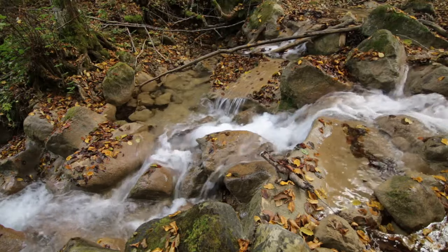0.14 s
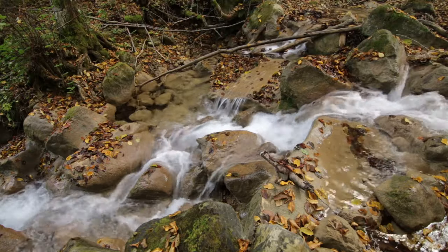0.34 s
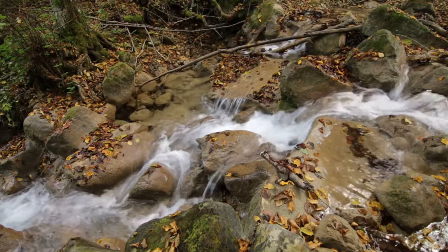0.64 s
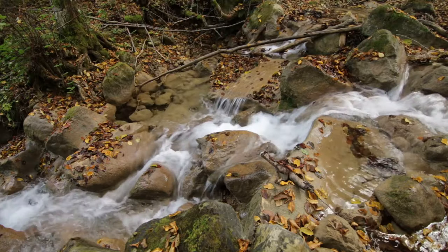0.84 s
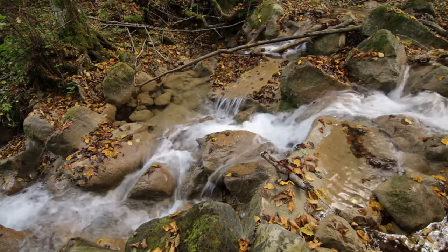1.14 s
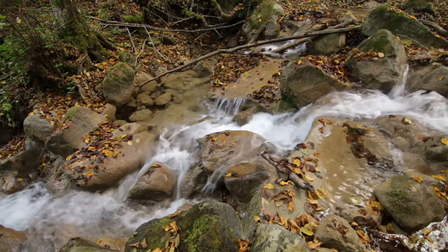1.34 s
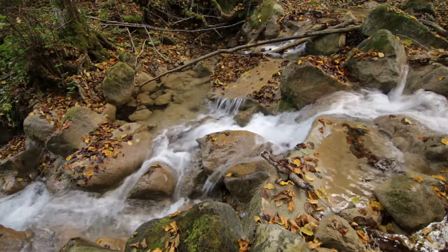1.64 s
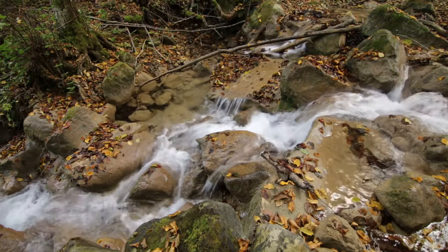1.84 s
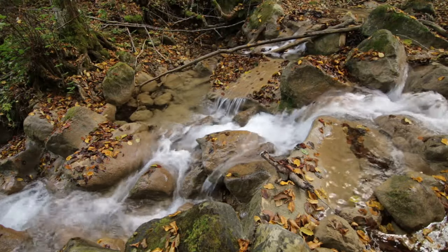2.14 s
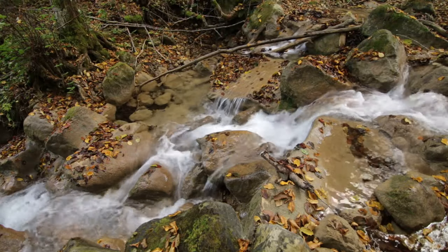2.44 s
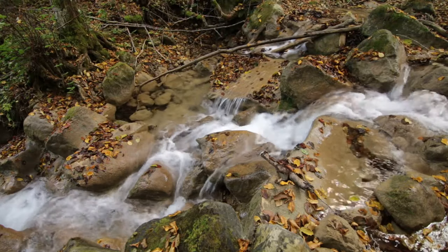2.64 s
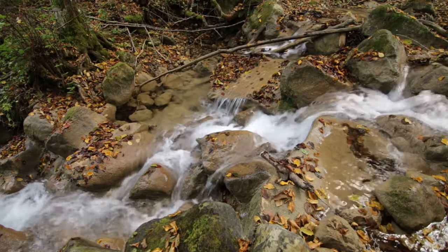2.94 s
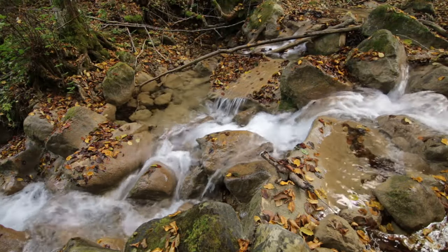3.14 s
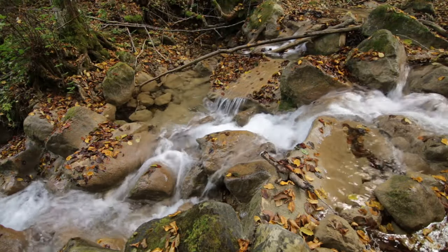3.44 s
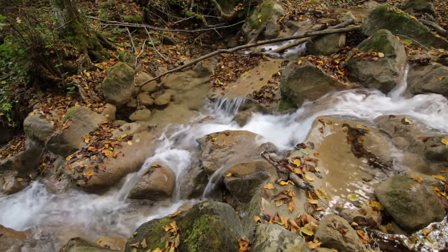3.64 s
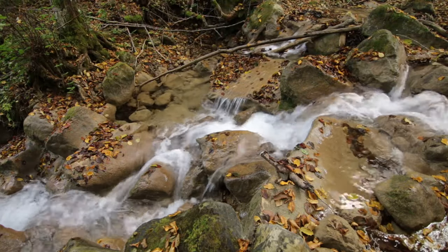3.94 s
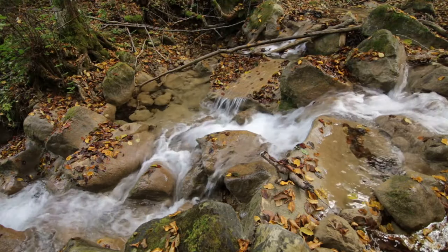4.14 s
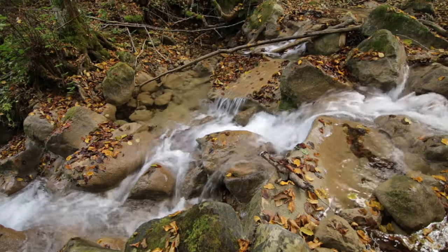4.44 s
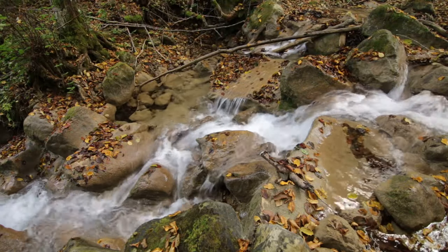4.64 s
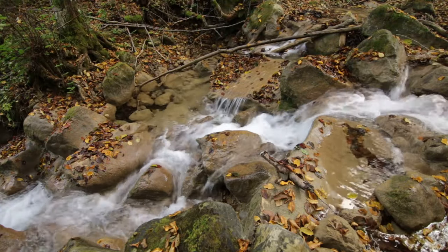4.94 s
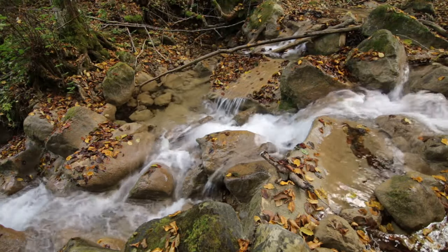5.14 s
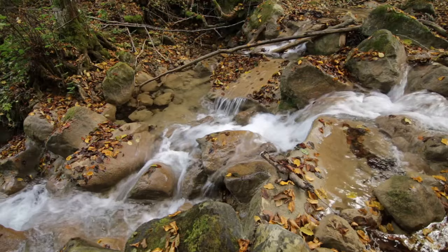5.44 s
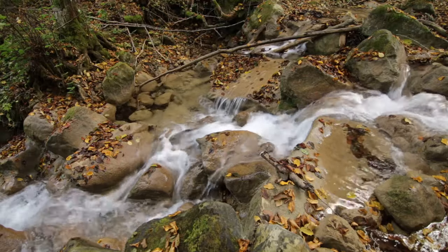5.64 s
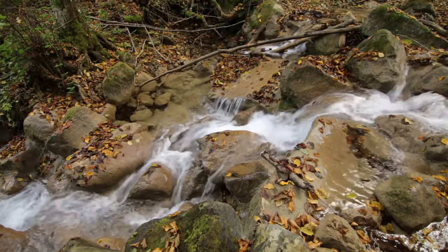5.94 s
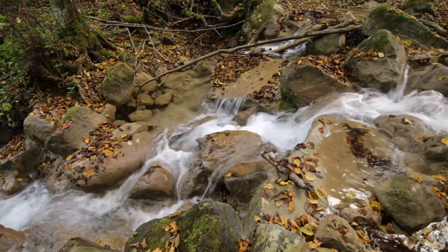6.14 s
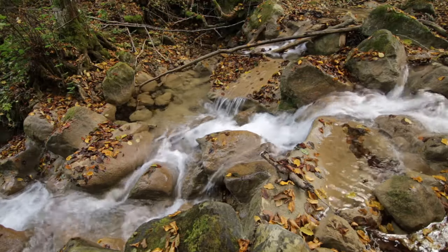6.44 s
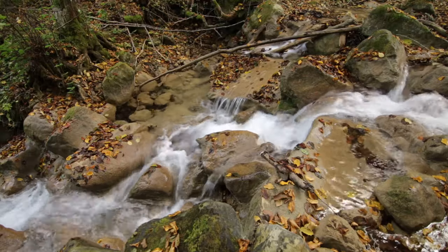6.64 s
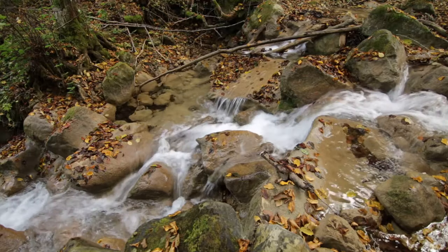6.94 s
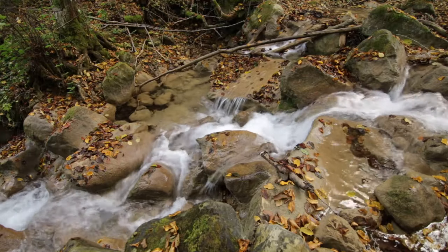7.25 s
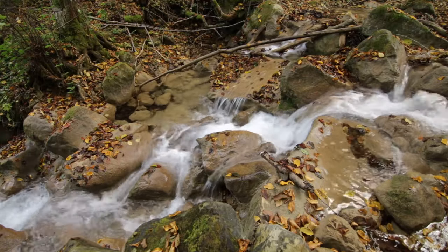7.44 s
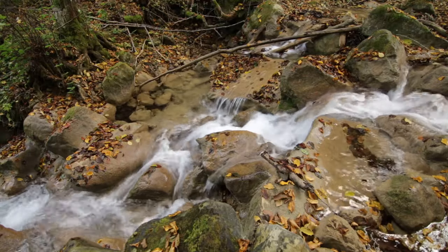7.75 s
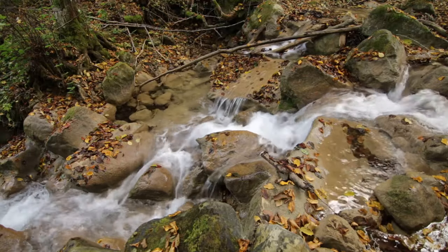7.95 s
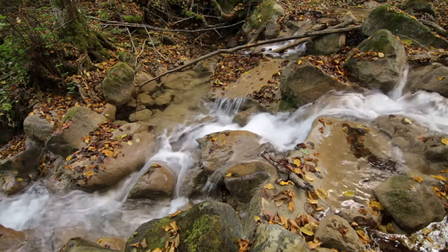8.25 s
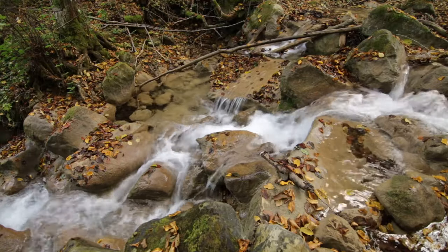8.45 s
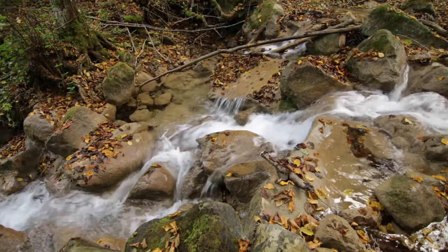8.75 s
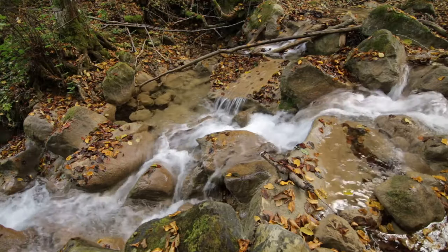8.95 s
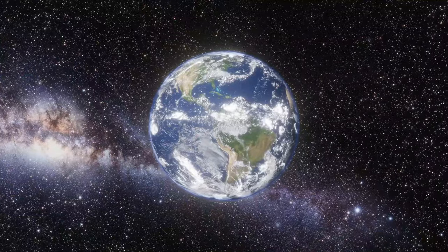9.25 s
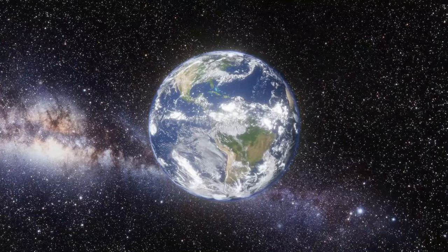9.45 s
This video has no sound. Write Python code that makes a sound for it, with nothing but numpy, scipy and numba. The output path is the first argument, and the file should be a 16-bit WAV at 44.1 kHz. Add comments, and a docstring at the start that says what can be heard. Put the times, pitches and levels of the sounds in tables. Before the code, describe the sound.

A small woodland stream tumbles over low rocks, heard close up in stereo from a few metres away. Dense bubbling and smooth watery rush run continuously, with rounded glugs, slapping drops, light patter and fine sparkle standing out irregularly. The level stays nearly constant with small, quick swells. A barely audible low breeze sits beneath. At about nine seconds everything cuts dead to silence.

```python
"""Forest: a small rocky stream tumbles over low cascades, a few metres from two close microphone ports.
Each fall is a swarm of ringing air bubbles over rushing noise; boulders echo it, banks scatter it.
Single glugs, drops, tinkles and plunges, each a damped sine of climbing pitch, stand out over patter
and sparkle; a faint breeze rumbles. The sound stops dead near the end."""
import sys
import numpy as np
from scipy import signal
from scipy.fft import rfft, irfft
from scipy.io import wavfile
from scipy.ndimage import uniform_filter1d
from numba import njit

SR = 44100
rng = np.random.default_rng(int(sys.argv[2]) if len(sys.argv) > 2 else 0)


def digitize_waveform(pressure):
    """Quantize a signal to 16-bit integers and store it at the path in sys.argv[1].

    Rows of a 2-D input are taken as channels; values are limited to [-1, 1].
    """
    field = np.atleast_2d(pressure).T
    bounded = np.clip(field, -1, 1)
    quanta = np.round(bounded * 32767).astype(np.int16)
    wavfile.write(sys.argv[1], SR, quanta)


N = 423801

# Falls. Each row: lag of the left port behind the right in ms, level in dB.
FALL_PATHS = [(-.09, -10), (-.03, -6.5), (.02, -5), (.05, -4), (.09, -6), (.15, -10.5)]
# Water spectrum ahead of layer levelling. Each row: frequency in Hz, relative density in dB per Hz.
WATER_SPECTRUM = [(20, -41), (80, -15), (115, -12.5), (200, -6), (500, -1), (1000, 2.5), (1700, -7),
                  (2600, -11.5), (3500, -13), (6000, -14), (10000, -14), (13500, -19.5), (15000, -24.5),
                  (15700, -32)]
# Peaks and dips of colour among the rocks. Each row: centre in Hz, width in Hz, gain in dB.
HOLLOWS = [(131, 21, 8), (636, 140, 3.5), (996, 62, 4.5), (1106, 83, 2.5), (420, 110, 3), (844, 150, -1.5),
           (1155, 51, 2), (1590, 160, 2.5), (1760, 250, -3), (2040, 240, 3), (2584, 340, 2.5),
           (3055, 350, 0.5), (3650, 180, 1), (4600, 220, 0.5), (5420, 230, 1), (6600, 400, 1),
           (7160, 300, -1)]
# Colour of what differs between the ports. Each row: frequency in Hz, gain in dB.
WIDE_COLOUR = [(100, 3.5), (700, 0.5), (1000, 0.5), (1300, 1.5), (1600, 5), (1750, -2), (2400, 0),
               (4000, 1), (6500, 0), (9000, -2.5), (15000, -0.5)]
# Port balance. Each row: frequency in Hz, left minus right in dB.
PORT_BALANCE = [(60, 2), (110, -1), (200, -1.5), (380, -1.5), (700, -1.0), (1290, -2.0), (2380, -2),
                (4400, -2), (8120, -3.0), (15000, -4)]
# Boulder echoes. Each row: delay in ms, amplitude share, phase lead in turns.
BOULDER_ECHOES = [(0.945, 0.15, 0.34), (1.8, 0.038, 0.015)]
# Base levels in dB of gurgle, churn of the falls, spray, fine mist.
LAYER_DB = (-25, -28, -26, -30)
# Random swells of pools, gurgle, churn, spray, mist. Each row: rms swell in dB, swells per second.
SWELLS = [(1.3, 10), (.45, 6), (.55, 8), (.4, 5), (.35, 4)]
# Level of the deep pools. Each row: time in seconds, level in dB.
POOL_LEVEL = [(0, -35), (1, -34), (2, -33), (3, -34.5), (4, -35.5), (5, -35.5), (6, -33.5), (7, -35.5),
              (8, -34.5), (8.9, -35.5)]
# Slow rise and fall of the layers above the pools. Each row: time in seconds, gain in dB.
FLOW_LEVEL = [(0, 0), (.45, -1), (.72, 0.3), (.95, -1), (1.1, 0.7), (1.3, -0.5), (2, -0.5), (3.6, -0.5),
              (4.6, -1), (5.2, 0.3), (5.85, -2), (6.1, -0.2), (6.45, -1), (6.65, -0.8), (7.2, -0.15),
              (8.62, -.5), (8.71, -0.2), (8.78, 0), (8.85, -0.5), (8.95, 0.3)]
# Splashes that lift spray and mist beside the flow. Each row: time in seconds, gain in dB.
SPLASH_LEVEL = [(0, 0), (.8, -1), (1.15, -0.8), (1.3, 1), (1.45, -0.1), (2.0, 0.5), (2.25, -0.5), (2.6, 0),
                (3.3, -0.5), (4.5, -0.5), (5.0, 0), (5.3, 0.5), (5.7, 0.5), (6.0, 0.5), (6.2, 0),
                (6.45, 0.5), (6.9, -0.7), (7.8, -1.1), (8.4, -1), (8.75, -1), (8.9, -1)]
# Louder single bubbles. Each row: start in seconds, strength in dB, starting pitch in Hz.
GLUGS = [(0.121, -12, 564), (0.262, -12.5, 567), (0.309, -7.5, 1040), (0.699, -7, 950), (1.062, -16, 595),
         (1.255, -18, 626), (1.285, -15, 680), (1.593, -9, 915), (1.966, -11.5, 610), (2.025, -11, 500),
         (2.123, -16, 452), (2.225, -8.5, 615), (2.305, -8.5, 725), (2.589, -6.5, 690), (2.844, -13, 640),
         (2.931, -10.5, 580), (3.155, -15.5, 1010), (3.375, -19.5, 126), (3.404, -11, 1000),
         (3.519, -16, 645), (3.57, -12, 1080), (3.62, -11, 450), (3.74, -17, 1020), (3.799, -7.5, 556),
         (4.009, -17, 555), (4.078, -15, 430), (4.189, -9, 570), (4.244, -7, 950), (4.396, -9, 1120),
         (4.43, -21.5, 126), (4.463, -11.5, 570), (4.608, -16, 635), (4.611, -17.5, 470),
         (4.638, -11.5, 288), (4.665, -18.5, 260), (4.87, -16, 1080), (4.979, -11.5, 397),
         (5.203, -6.5, 980), (5.246, -11.5, 467), (5.282, -18, 560), (5.52, -12, 1000), (6.016, -10.5, 990),
         (6.052, -14.5, 497), (6.12, -11, 630), (6.479, -12, 636), (6.655, -8, 724), (6.853, -12, 1000),
         (6.86, -10, 663), (7.617, -13, 577), (7.7, -20, 125), (7.869, -13, 290), (7.952, -19, 915),
         (8.032, -13, 433), (8.282, -12.5, 619), (8.699, -12, 627), (8.784, -9, 635), (8.845, -9, 1130),
         (8.875, -9.5, 1000)]
# Drops that slap stone or water. Each row: start in seconds, strength in dB, starting pitch in Hz.
DROPS = [(0.1265, -6.5, 2570), (0.5037, -10, 2100), (0.9546, -10.5, 2174), (1.9998, -11, 2760),
         (2.4926, -10, 2580), (2.833, -10, 1930), (2.9581, -12.5, 2560), (3.0125, -9, 2260),
         (5.5287, -5, 2635), (6.4556, -5, 2030), (7.8012, -0.5, 960), (8.3488, -9, 1544),
         (8.6252, -13, 2120)]
# Small clear, high bubbles. Each row: start in seconds, strength in dB, starting pitch in Hz.
TINKLES = [(1.158, -27, 4565), (1.312, -18.5, 1370), (1.352, -23.5, 1890), (2.116, -23.5, 2670),
           (2.29, -25.5, 3790), (5.361, -24.5, 3570), (5.963, -20, 2110), (6.101, -31, 3870),
           (6.167, -23.5, 2880), (8.524, -26.5, 4050)]
# Slowly closing air pockets. Each row: start in seconds, strength in dB, starting pitch in Hz.
PLUNGES = [(7.335, -16.5, 3270), (8.682, -19.5, 397), (8.708, -19.5, 340), (8.765, -21.5, 450)]

BUBBLES_PER_S, PATTER_PER_S, SPARKLE_PER_S = 1700, 120, 420
LAYER_EDGES_HZ = (220, 820, 1800, 5200)  # pools | gurgle | churn | spray | mist
PORT_GAP_M, SOUND_M_PER_S, BANKS_DB = 0.1, 343, -4.5
BOULDER_DULL_HZ = 8930
WIDE_HOLLOW_SHARE = 0.38  # share of the hollows' dB in what differs between the ports
BREEZE_DB, BREEZE_LOW_HZ, BREEZE_HIGH_HZ = -51, 45, 250
STOP_S, TOP_HZ = 8.9525, 15700


def undb(db):
    """dB to gain."""
    return 10 ** (np.asarray(db) / 20)


def unit(x):
    """Scale to rms 1."""
    return x / np.sqrt(np.mean(x ** 2))


def on_log(table, hz):
    """Read a (Hz, value) table on a log-frequency axis."""
    table_hz, value = np.transpose(table)
    return np.interp(np.log(hz + 1), np.log(table_hz + 1), value)


def curve(table):
    """Read a (s, dB) table at every sample."""
    return np.interp(np.arange(N) / SR, *np.transpose(table))


def walk(rate_hz):
    """Random levels held 1 / rate_hz s, smoothed twice; rms 1."""
    hold = int(SR / rate_hz)
    steps = np.repeat(rng.standard_normal(N // hold + 1), hold)[:N]
    return unit(uniform_filter1d(uniform_filter1d(steps, hold), hold))


@njit
def ring(start, hz, cycles, size, rise, n):
    """Damped sines: swell in about a cycle, lose 50 dB in `cycles` while pitch climbs by share `rise`."""
    out = np.zeros(n)
    for k in range(len(hz)):
        length = int(cycles[k] * SR / hz[k]) + 2
        w = 2 * np.pi * hz[k] / SR
        phasor = size[k] + 0j
        step = np.exp(1j * w - 5.76 / length)
        glide = np.exp(1j * w * rise[k] / length)
        shut, opening = 1., np.exp(-w / 3)
        for i in range(start[k], min(start[k] + length, n)):
            out[i] += phasor.imag * (1 - shut)
            phasor *= step
            step *= glide
            shut *= opening
    return out


def arrive(x, hz, late_ms, db):
    """Spectra at both ports of one direction, the lag split evenly between them."""
    half_lag = np.exp(-1j * np.pi * hz * late_ms / 1000)
    return undb(db) * rfft(x) * np.array([half_lag, 1 / half_lag])


def swarm(cycles=25.8, slope=0.52, spread_db=1.7, most_db=5.5, calm=0.92, rise=0.21,
          rush_db=3.0, surge_db=0.5):
    """One fall: bubbles of all sizes, small ones more common per octave and more alike, over a rush."""
    when, pick, loud, sign, long = rng.random((BUBBLES_PER_S * N // SR, 5)).T
    start = (when * N).astype(np.int64)
    pitch_hz = (10 + 112 * pick) ** 2
    loud_db = np.minimum(-spread_db * np.log(1 - loud), most_db) * (1 - calm * pick)
    size = (pitch_hz / 1000) ** slope * undb(loud_db) * np.sign(sign - .5)
    bubbles = ring(start, pitch_hz, cycles * (.5 + long), size, rise * long, N)
    bubbles = np.roll(bubbles, -SR // 4)  # already ringing at the start
    rush = undb(rush_db) * rng.standard_normal(N)
    return unit(unit(bubbles) + rush) * undb(surge_db * walk(14))


def banks(hz):
    """Water scattered from all sides: alike at both ports only for long waves."""
    alike = np.sinc(2 * hz * PORT_GAP_M / SOUND_M_PER_S)
    mid = np.sqrt(1 + alike) * rfft(swarm())
    side = np.sqrt(1 - alike) * rfft(swarm())
    return undb(BANKS_DB) * np.array([mid + side, mid - side]) / np.sqrt(2)


def boulders(hz):
    """Short echoes off the nearest rocks comb the sound; treble scatters and escapes the comb."""
    echoes = sum(share * np.exp(2j * np.pi * (turns - hz * ms / 1000))
                 for ms, share, turns in BOULDER_ECHOES)
    return 1 + echoes / (1 + (hz / BOULDER_DULL_HZ) ** 4)


def rocks(pair, hz):
    """Hollows and echoes lie straight ahead: they colour mostly what both ports share."""
    hollow_db = sum(db / (1 + (2 * (hz - centre_hz) / width_hz) ** 2)
                    for centre_hz, width_hz, db in HOLLOWS)
    left, right = pair
    shared = (left + right) / 2 * boulders(hz) * undb(hollow_db)
    wide = (left - right) / 2 * undb(WIDE_HOLLOW_SHARE * hollow_db + on_log(WIDE_COLOUR, hz))
    return np.array([shared + wide, shared - wide])


def stream(hz):
    """Falls and banks, coloured by rocks, split into bands from pools to mist that swell separately."""
    falls = sum(arrive(swarm(), hz, late_ms, db) for late_ms, db in FALL_PATHS)
    water = rocks(falls + banks(hz), hz) * undb(on_log(WATER_SPECTRUM, hz))
    below = [0] + [1 / (1 + (hz / edge_hz) ** 6) for edge_hz in LAYER_EDGES_HZ] + [1]
    gurgle_db, churn_db, spray_db, mist_db = (db + curve(FLOW_LEVEL) for db in LAYER_DB)
    splash_db = curve(SPLASH_LEVEL)
    level_db = [curve(POOL_LEVEL), gurgle_db, churn_db, spray_db + splash_db, mist_db + splash_db]
    total = 0
    for k, (swell_db, rate_hz) in enumerate(SWELLS):
        layer = unit(irfft(water * (below[k + 1] - below[k]), N))
        total = total + layer * undb(level_db[k] + swell_db * walk(rate_hz))
    return total


def breeze(hz):
    """Moving air: faint low rumble of filtered noise, unrelated at the two ports."""
    dull = hz ** 2 / (hz ** 2 + BREEZE_LOW_HZ ** 2) / (1 + (hz / BREEZE_HIGH_HZ) ** 2)
    noise = rng.standard_normal((2, N))
    return undb(BREEZE_DB) * unit(irfft(rfft(noise) * dull, N))


def patter(low_hz=450, octaves=3.4, at_1khz_db=-28.5, fall_db=4.5, spread_db=1.5, clump_db=2.5,
           cycles=22.2, rise=.5):
    """Near droplets and small bubbles whose level swells in clumps, softer by fall_db per octave up."""
    when, pick, loud, long = rng.random((PATTER_PER_S * N // SR, 4)).T
    start = (when * N).astype(np.int64)
    pitch_hz = low_hz * 2 ** (octaves * pick)
    db = at_1khz_db - fall_db * np.log2(pitch_hz / 1000)
    db = db - spread_db * np.log(1 - .95 * loud) + clump_db * walk(7.1)[start]
    return ring(start, pitch_hz, cycles * (.5 + long), undb(db), rise * long, N)


def sparkle(low_hz=1700, octaves=2.9, at_4khz_db=-35, fall_db=3.5, spread_db=2.2, clump_db=2.0,
            splash_share=1.2, cycles_at_4khz=170, rise=.04):
    """Tiny bubbles that ring long in the foam, stronger when the water splashes."""
    when, pick, loud, long = rng.random((SPARKLE_PER_S * N // SR, 4)).T
    start = (when * N).astype(np.int64)
    pitch_hz = low_hz * 2 ** (octaves * pick)
    swell_db = clump_db * walk(4.06) + splash_share * curve(SPLASH_LEVEL)
    db = at_4khz_db - fall_db * np.log2(pitch_hz / 4000)
    db = db - spread_db * np.log(1 - .95 * loud) + swell_db[start]
    cycles = cycles_at_4khz * (.5 + long) * np.sqrt(pitch_hz / 4000)
    return ring(start, pitch_hz, cycles, undb(db), rise * long, N)


def ring_rows(table, cycles, rise):
    """Ring every (s, dB, Hz) row with the same cycles and pitch climb."""
    start_s, db, pitch_hz = np.transpose(table)
    start = (start_s * SR).astype(np.int64)
    count = len(table)
    return ring(start, pitch_hz, np.full(count, float(cycles)), undb(db), np.full(count, rise), N)


def glugs():
    """Louder single bubbles: short rings that climb slightly."""
    return ring_rows(GLUGS, cycles=16, rise=0.18)


def drops():
    """Slaps on stone or water: rings damped within a few cycles."""
    return ring_rows(DROPS, cycles=7, rise=0.394)


def tinkles():
    """Small bubbles: lightly damped, nearly steady in pitch."""
    return ring_rows(TINKLES, cycles=90, rise=.04)


def plunges():
    """Air pockets that close slowly: pitch sweeps far upwards."""
    return ring_rows(PLUNGES, cycles=34, rise=2.2)


def scene():
    """Stream, near sounds from the fourth fall's direction, and breeze; the right port faces the water."""
    hz = np.arange(N // 2 + 1) * SR / N
    water = rfft(stream(hz))
    singles = glugs() + drops() + tinkles() + plunges()
    near = arrive(singles + patter() + sparkle(), hz, FALL_PATHS[3][0], 0) * boulders(hz)
    side_db = on_log(PORT_BALANCE, hz)
    balance = undb(np.array([side_db, -side_db]) / 2)
    return irfft((water + near) * balance, N) + breeze(hz)


def record(dry):
    """Lift by 0.5 dB, cut off with a faint trail of under 40 ms, low-pass steeply."""
    after_s = np.arange(N) / SR - STOP_S
    trail_db = np.interp(after_s, [0, .002, .018, .027, .04], [0.5, -12, -32, -55, -120])
    cut = dry * undb(trail_db) * (after_s < .04)
    low_pass = signal.ellip(14, .2, 80, TOP_HZ, fs=SR, output="sos")
    return signal.sosfilt(low_pass, cut)


dry = scene()
out = record(dry)
digitize_waveform(out)
```